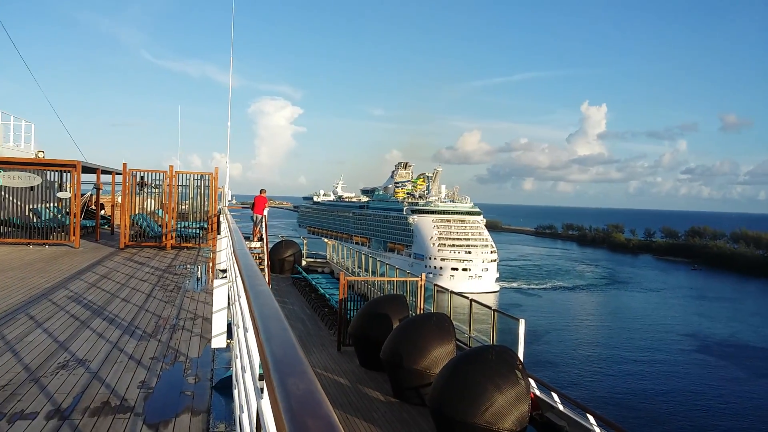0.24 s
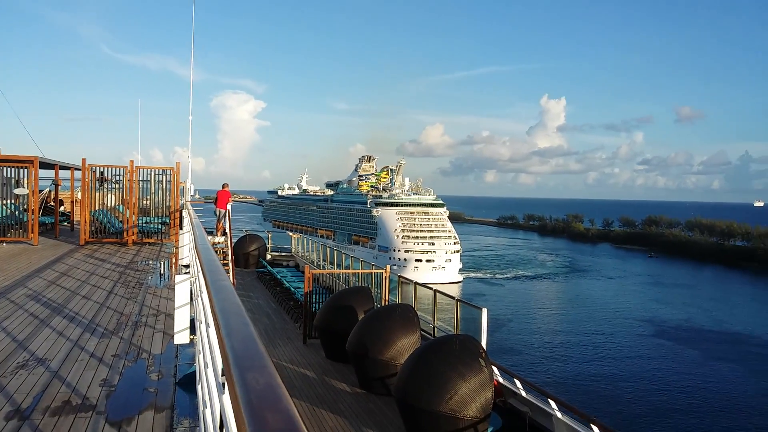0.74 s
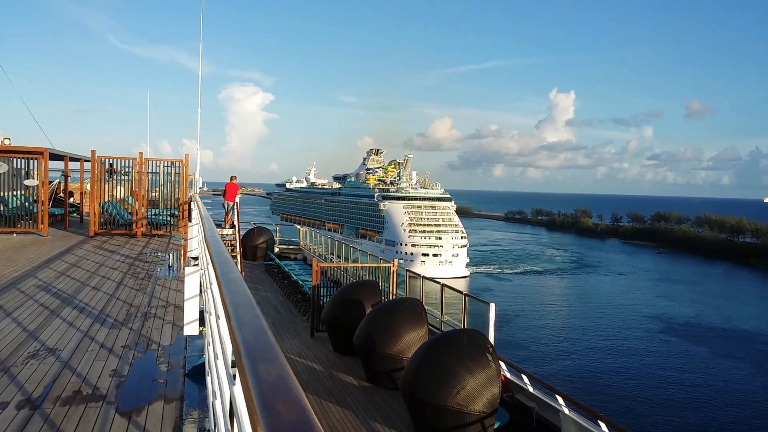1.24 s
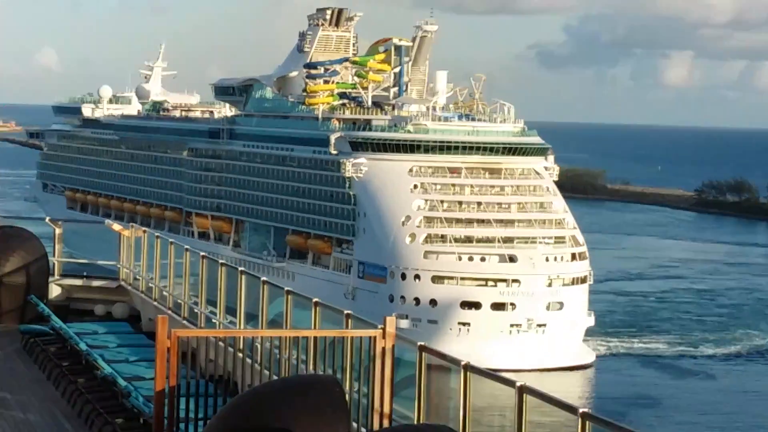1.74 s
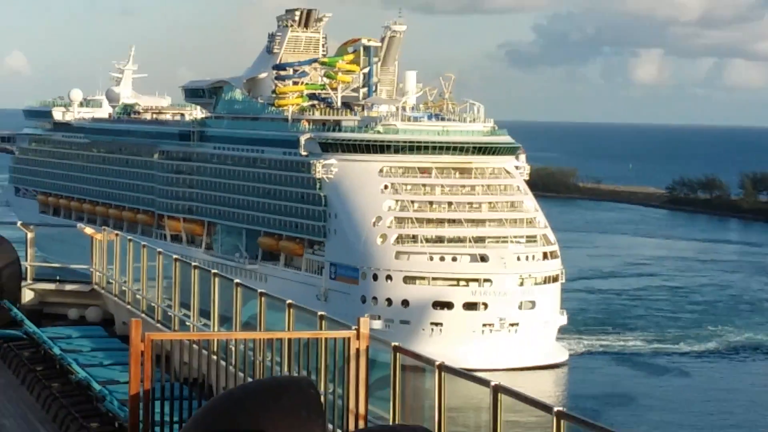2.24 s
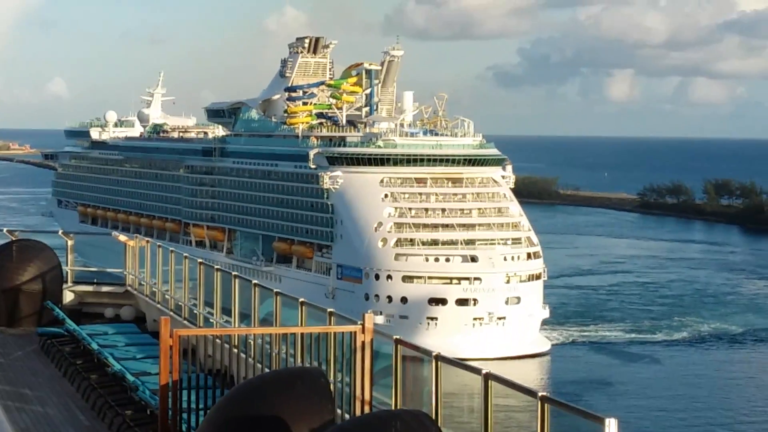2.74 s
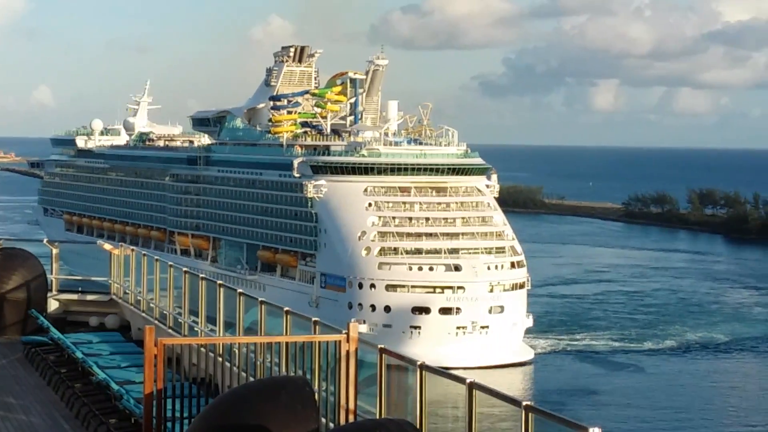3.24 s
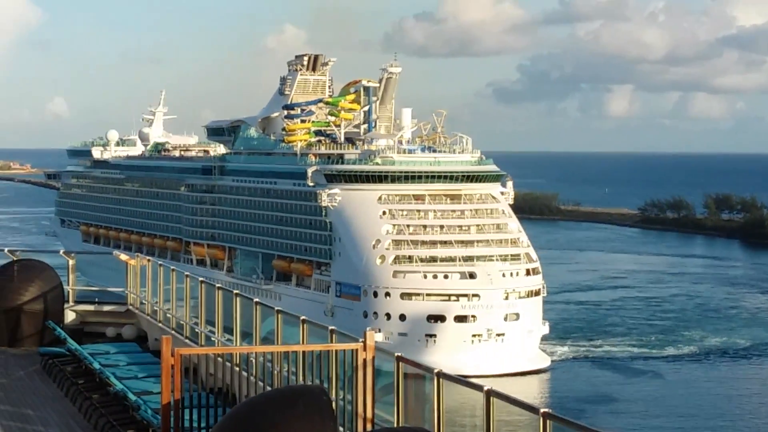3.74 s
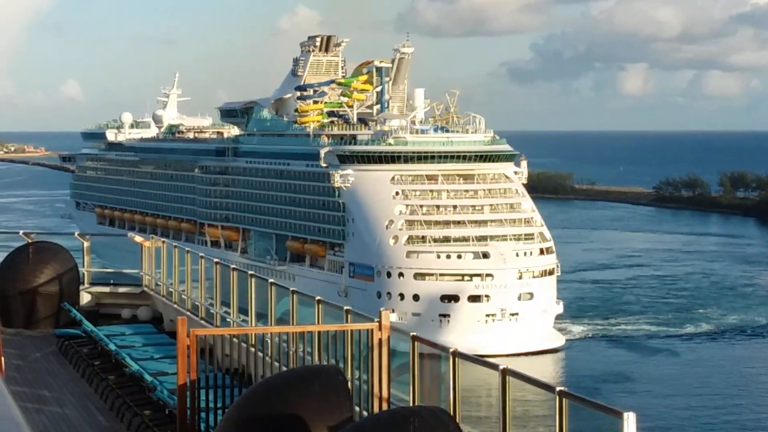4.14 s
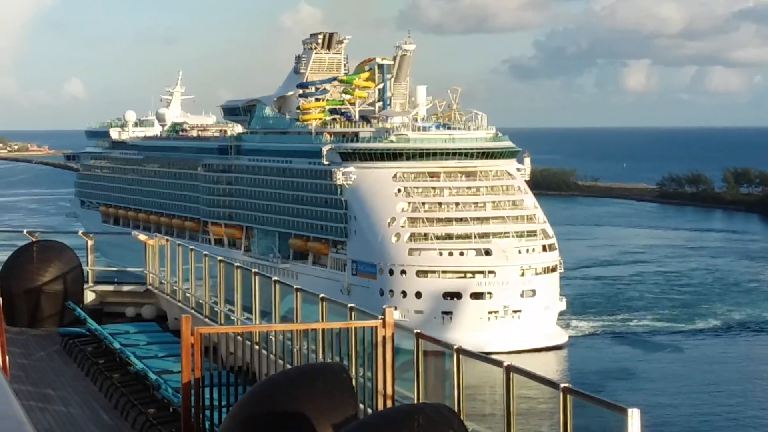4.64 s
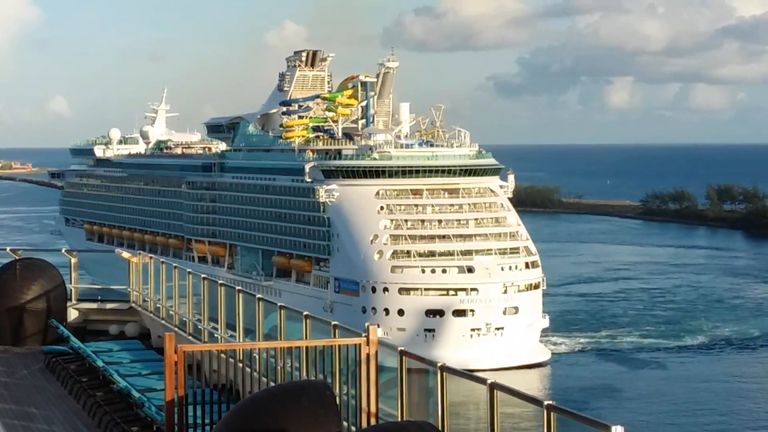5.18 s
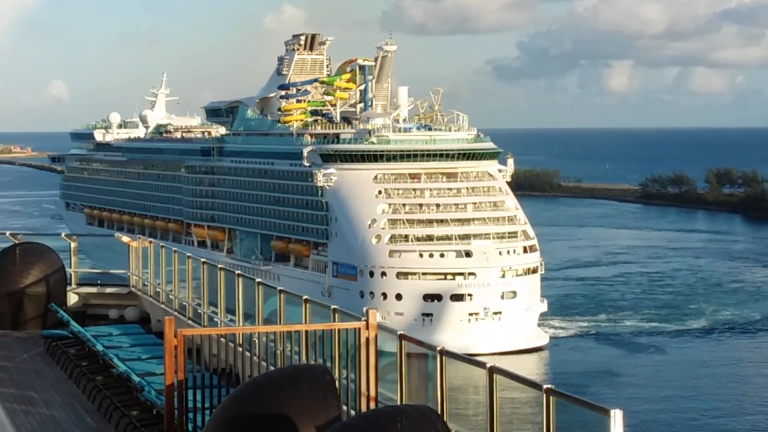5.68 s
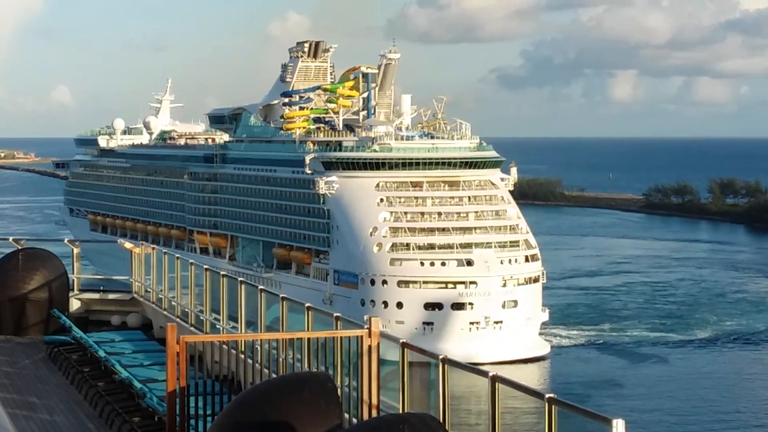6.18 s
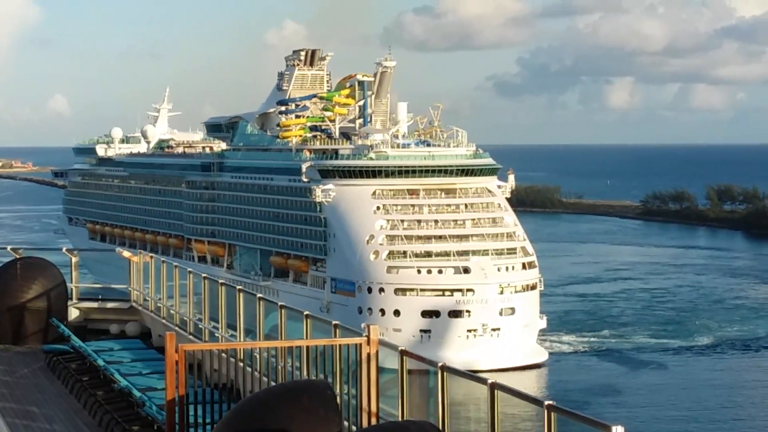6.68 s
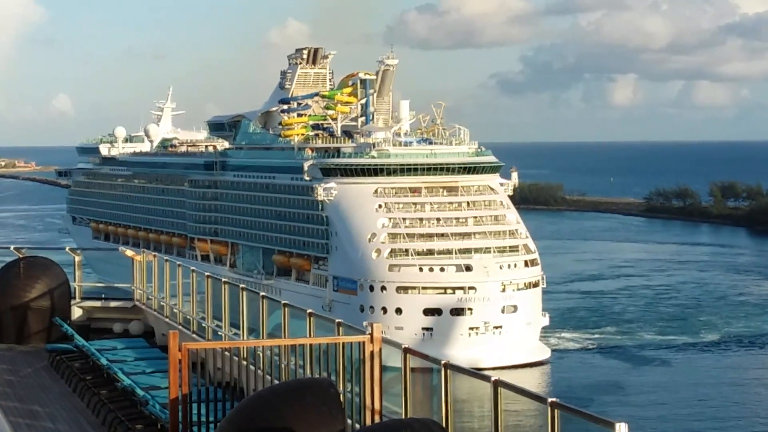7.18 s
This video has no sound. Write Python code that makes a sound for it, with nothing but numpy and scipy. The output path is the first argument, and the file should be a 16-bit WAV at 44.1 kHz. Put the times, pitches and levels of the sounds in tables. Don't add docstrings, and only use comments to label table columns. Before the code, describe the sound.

Deep throbbing ship engine surges, holds and suddenly falls, with constant vent and water hiss, late wind buffets and a faint singing rail.

```python
import sys
import numpy as np
from scipy import signal
from scipy.fft import rfft, irfft, next_fast_len
from scipy.io import wavfile
from scipy.ndimage import uniform_filter1d, map_coordinates

SR = 44100
rng = np.random.default_rng(int(sys.argv[2]) if len(sys.argv) > 2 else 0)


def bounce(signal):
    frames = np.transpose(np.atleast_2d(signal))
    limited = np.clip(frames, -1, 1)
    pcm = np.round(limited * 32767).astype(np.int16)
    wavfile.write(sys.argv[1], SR, pcm)


def ratio_of_db(decibels):
    return 10 ** (np.asarray(decibels, float) / 20)


N = 327033


def unit(x):
    return x / np.sqrt(np.mean(x ** 2) + 1e-20)


def along(points, hz):
    f, v = np.transpose(points)
    return np.interp(np.log(hz + 1), np.log(f + 1), v)


def curves(rows):
    s, *cols = np.transpose(rows)
    return [np.interp(np.arange(N) / SR, s, c) for c in cols]


def wobble(rate_hz):
    knots = rng.standard_normal(int(N * rate_hz / SR) + 4)
    return map_coordinates(knots, [np.arange(N) * rate_hz / SR])


def filtered(x, response):
    m = next_fast_len(N + 8192)
    return irfft(rfft(x, m) * response(np.fft.rfftfreq(m, 1 / SR)), m)[..., :N]


def ports(pair, alike):
    # (frequency [Hz], lead [rad])
    lead_rad = [(30, 0), (250, .12), (430, .3), (600, .95), (860, 1.1), (1350, 3.1), (1750, 4.6),
                (2200, 4.8), (3500, 7)]

    def turn(hz):
        return np.arccos(np.clip(along(alike, hz), 0, 1)) / 2

    def lag(hz):
        return np.exp(.5j * along(lead_rad, hz) * np.array([[1], [-1]]))

    mid, side = filtered(pair, lambda hz: np.array([np.cos(turn(hz)), np.sin(turn(hz))]))
    return filtered(np.array([mid + side, mid - side]), lag)


def patchy(depth_db):
    z = signal.stft(rng.standard_normal((2, N)), nperseg=512)[2]
    field = rng.standard_normal(z.shape[1:])
    field = uniform_filter1d(field, size=5, axis=0)
    field = uniform_filter1d(field, size=12, axis=1)
    return signal.istft(z * ratio_of_db(depth_db * unit(field)), nperseg=512)[1][:, :N]


def bursts(rows, rest_db):
    t = np.arange(0, N + 64, 64) / SR
    power = ratio_of_db(2 * rest_db)
    for s, half_s, db in rows:
        power = power + ratio_of_db(2 * db) * np.exp(-2 * ((t - s) / half_s) ** 2)
    return np.interp(np.arange(N) / SR, t, 10 * np.log10(power))


def engine_level():
    idle_db, primed_db, full_db, surge_db, low_db = -20, -10, -2, 4, -19
    prime_s, jump_s, drop_s = 1.25, 1.56, 6.657
    prime_rise_s, snap_s, surge_s, fade_db_per_s = .4, 0.011, 0.088, -11.5
    t = np.arange(N) / SR

    def step(s, rise_s):
        return np.clip((t - s) / rise_s + .5, 0, 1)

    full = full_db + surge_db * np.exp(-np.abs(t - jump_s) / surge_s)
    fading = low_db + fade_db_per_s * (t - drop_s)
    level = idle_db + step(prime_s, prime_rise_s) * (primed_db - idle_db)
    level = level + step(jump_s, snap_s) * (full - level)
    return level + step(drop_s, snap_s) * (fading - level)


def engine():
    # (shaft order [-], just after the jump [dB], speeding up [dB], settled [dB], cruising [dB])
    orders_db = [(4, -36, -33, -28.5, -30), (5, -36, -41, -40, -38), (6, -44, -39, -41, -40),
                 (7, -41, -41, -37, -37), (8, -36, -35, -32, -33), (9, -40, -41, -43, -46),
                 (10, -37, -45, -43, -42), (11, -37, -29, -29.5, -28.5), (12, -24, -30, -28, -29),
                 (13, -32, -24, -30, -29), (14, -41, -41, -41, -42), (15, -40, -36, -39, -38),
                 (16, -28, -27, -38, -40), (17, -31, -37, -40, -39), (18, -44, -48, -43, -46),
                 (19, -38, -44, -41, -44), (20, -45, -42, -43, -40), (21, -42, -42, -43, -45),
                 (22, -40, -44, -43, -40), (23, -38, -40, -49, -47)]
    # (frequency [Hz], density [dB per Hz])
    roar_db = [(15, -45), (25, -18), (55, -3), (110, -2), (160, -4), (210, -2), (290, -5), (370, -6),
               (480, -17), (600, -20), (780, -50), (1320, -120)]
    # (time [s], shaft speed [Hz])
    speed_hz = [
        (0, 12.6),
        (1.0, 13.2),
        (1.35, 14.76),
        (1.6, 15.5),
        (2.05, 16.42),
        (2.68, 17.31),
        (2.9, 17.17),
        (6.4, 17.11),
        (6.6, 16.2),
    ]
    # (time [s], running stage [0-3])
    stages = [
        (1.8, 0),
        (2.0, 1),
        (2.36, 1),
        (2.6, 2),
        (3.9, 2),
        (4.6, 3),
    ]
    turns = np.cumsum(curves(speed_hz)[0]) / SR
    stage = curves(stages)[0]
    hum = np.zeros(N)
    for order, *stage_db in orders_db:
        level_db = np.interp(stage, np.arange(len(stage_db)), stage_db) + 1.7 * wobble(4)
        smear = 1.1e-5 * order ** 3 * wobble(8)
        phase = round(order) * turns + rng.random() + smear
        hum += np.sqrt(2) * ratio_of_db(level_db) * np.sin(2 * np.pi * phase)
    hum = hum * [[1.3], [.08]]
    throb = ratio_of_db(2.1 * np.cos(2 * np.pi * turns) + 0.4 * wobble(10.0))
    roar = filtered(throb * patchy(depth_db=-1.0), lambda hz: ratio_of_db(along(roar_db, hz)))
    roar = ratio_of_db(-25.5) * unit(roar)
    return ports(ratio_of_db(engine_level()) * (hum + roar), [(40, 1.0), (500, 0.76)])


def deck():
    # (frequency [Hz], density [dB per Hz])
    left_db = [(30, -21), (60, 5), (150, -3.5), (300, -1.5), (500, -7), (900, -11), (1500, -20.5),
               (2200, -24), (3200, -28), (4200, -31), (5100, -29.5), (6000, -42.5), (7500, -54.5),
               (11000, -67.5)]
    right_db = [(30, -23), (60, 2), (150, -1), (300, -1.5), (500, -7), (900, -8.5), (1500, -15),
                (2200, -24), (3200, -31.5), (4200, -44), (5100, -50.5), (6000, -50.5), (7500, -62.5),
                (11000, -65.5)]
    # (frequency [Hz], left-right likeness [0-1])
    alike = [(40, 1), (150, 0.78), (330, .93), (520, 0.2), (620, 1), (850, 0.7), (1150, 0.34), (1750, .75),
             (2100, 0.6), (2400, .12), (5000, 0.092)]
    # (frequency [Hz], level [dB rms])
    fan_tones = [
        (151.5, -38.5),
        (231.5, -42),
    ]
    # (time [s], nearness [0-1])
    finger = [
        (1.12, 0.2),
        (1.2, 0.97),
        (2.52, 0.99),
        (2.58, 0.24),
    ]
    # (frequency [Hz], gain [dB])
    shadow_db = [(1100, 1), (1500, 6), (2050, 4.5), (2400, -5), (3500, -5), (4400, 0)]
    hiss_db, lull_s, lull_db = -28, 6.4, -0.65
    t = np.arange(N) / SR
    hiss = ports(patchy(depth_db=0.64), alike)
    hiss = filtered(hiss, lambda hz: ratio_of_db(np.array([along(left_db, hz), along(right_db, hz)])))
    near = np.clip(curves(finger)[0], 0, 1)
    shadowed = filtered(hiss[0], lambda hz: ratio_of_db(along(shadow_db, hz)))
    hiss[0] += near * (shadowed - hiss[0])
    fans = np.zeros(N)
    for hz, db in fan_tones:
        fans += ratio_of_db(db + 3 + 1.2 * wobble(3)) * np.sin(2 * np.pi * hz * t + .3 * wobble(4))
    lull = lull_db * np.clip((t - lull_s) / .5 + .5, 0, 1)
    return ratio_of_db(hiss_db + lull + 0.32 * wobble(6.4)) * unit(hiss) + fans


def eddies(rows, brevity, sway):
    t = np.arange(-2048, 2048) / SR
    out = np.zeros(N + 4096)
    for (s, db, hz), turn in zip(rows, rng.normal(0, sway, len(rows))):
        cycle = 2 * np.pi * (hz * t + turn)
        push = np.sin(cycle) + 0.13 * np.sin(2 * cycle) + 0.089 * np.sin(3 * cycle)
        out[round(s * SR):][:4096] += ratio_of_db(db) * np.exp(-(brevity * hz * t) ** 2) * push
    return out[2048:N + 2048]


def wind():
    # (time [s], half length [s], level [dB])
    gusts = [(.1, 0.051, -20), (.35, .1, -34), (.9, .05, -20.5), (1.17, 0.054, -18), (2.1, .04, -24),
             (2.5, .14, -24.5), (3.0, .07, -31), (3.5, .05, -27), (3.72, .07, -26), (4.0, 0.068, -12.5),
             (4.17, 0.095, -12.5), (4.4, 0.095, -14.5), (5.0, .05, -33), (5.55, 0.11, -15.5),
             (6.03, 0.083, -16), (6.2, 0.042, -3), (6.4, 0.044, -11), (6.6, 0.16, -12.5), (6.92, 0.12, -25),
             (7.3, 0.11, -19.5)]
    # (frequency [Hz], density [dB per Hz])
    buffet_db = [(15, -43.5), (25, -19.5), (59, 2), (172, -3), (234, -15), (339, -13), (926, -27),
                 (1200, -35.5), (1560, -68.5), (2640, -120)]
    # (time [s], puff level [dB], puff pitch [Hz], thud level [dB])
    large = [(2.577, -17, 140, -18), (3.969, -5, 140, -17), (4.008, -6, 200, -14), (4.034, -12, 140, -13),
             (4.203, -7, 210, -17), (4.411, -10, 180, -21), (4.454, -16, 140, -15), (5.475, -6, 240, -17),
             (5.999, -10, 270, -17), (6.063, -12, 150, -22), (6.146, -12, 140, -12), (6.189, -11, 180, -14),
             (6.212, -10, 400, -25), (6.302, -7, 200, -13), (6.32, -7, 190, -12), (6.389, -10, 170, -22),
             (6.414, -6, 150, -13), (6.436, -4, 250, -11), (6.488, -8, 170, -13), (6.54, -5, 200, -13),
             (6.562, -10, 160, -16), (6.675, -10, 660, -18), (6.701, -9, 200, -23), (6.727, -10, 180, -21),
             (6.777, -15, 450, -25), (6.922, -8, 230, -20), (6.99, -9, 250, -24), (7.014, -16, 130, -15),
             (7.087, -11, 210, -24), (7.39, -13, 450, -28)]
    calm_db, thud_hz, thud_lag_s = -42.5, 80, .003
    small_per_s, small_hz = 40, 171
    small_db, small_thud_db, small_grows = -19, -5.5, .7

    gust_db = bursts(gusts, calm_db)
    lumps = ratio_of_db(3 * wobble(30)) * rng.standard_normal(N)
    buffet = unit(filtered(lumps, lambda hz: ratio_of_db(along(buffet_db, hz))))
    buffet = ratio_of_db(gust_db - 12.5) * buffet

    count = int(small_per_s * N / SR)
    time_luck, level_luck, pitch_luck, thud_luck = rng.random((count, 4)).T
    s = (np.arange(count) + time_luck) / small_per_s
    db = small_db + small_grows * (gust_db[(s * SR).astype(int)] + 15) + 10 * (level_luck - .5)
    hz = small_hz * 1.8 ** (pitch_luck - .4)
    small = np.transpose([s, db, hz, db + small_thud_db + 8 * (thud_luck - .5)])

    s, puff_db, hz, thud_db = np.vstack([large, small]).T
    puffs = ratio_of_db(.8) * eddies(np.transpose([s, puff_db, hz]), brevity=1.8, sway=.12)
    rock_hz = thud_hz * (1 + 0.13 * rng.standard_normal(len(s)))
    thuds = ratio_of_db(3.5) * eddies(np.transpose([s + thud_lag_s, thud_db, rock_hz]), brevity=1.0, sway=0.28)
    return (buffet + puffs + thuds) * ratio_of_db([[0], [-24]])


def fittings():
    # (time [s], half length [s], level [dB])
    rail = [
        (6.32, .08, -39),
        (6.55, .03, -41),
        (6.67, .06, -39),
        (6.79, .03, -32),
        (6.89, .035, -32.5),
        (7.06, .05, -39),
        (7.2, .04, -41),
    ]
    # (time [s], length [s], pitch [Hz], width [Hz], level [dB])
    squeaks = [
        (1.165, .09, 4540, 700, -60),
        (1.364, .004, 5200, 2600, -56),
        (1.69, .046, 5000, 760, -59),
        (2.403, 0.13, 475, 9.5, -31.5),
        (2.508, .08, 1040, 110, -40),
        (3.95, .08, 5100, 300, -63),
        (4.21, .12, 5080, 250, -59),
        (4.923, 0.16, 888, 13, -40.5),
        (5.227, 0.18, 1165, 16, -43),
    ]
    # (frequency [Hz], left over right [dB])
    squeak_pan_db = [(470, -3), (1100, 7), (5000, 13.5)]
    rail_hz, sag_hz_per_s, hum_db, from_s, to_s = 775, 12, -46, 6.2, 7.25
    t = np.arange(N) / SR
    pitch_hz = rail_hz - sag_hz_per_s * np.clip(t - rail[1][0], 0, 1) + 3 * wobble(7)
    awake = np.clip(np.minimum(t - from_s, to_s - t) / 0.11 + 1, 0, 1)
    rail_db = bursts(rail, hum_db) + np.array([[-2.5], [2.1]])
    out = awake * ratio_of_db(rail_db) * np.sin(2 * np.pi * np.cumsum(pitch_hz) / SR)
    for s, length_s, hz, width_hz, db in squeaks:
        near = slice(round(s * SR) - 16384, round(s * SR) + 16384)
        band = np.exp(-((np.fft.rfftfreq(32768, 1 / SR) - hz) / width_hz) ** 2)
        scrape = unit(irfft(band * rfft(rng.standard_normal(32768))))
        swell = np.exp(-4 * ((t[near] - s) / length_s) ** 2)
        pan = ratio_of_db(along(squeak_pan_db, hz) * np.array([[.5], [-.5]]))
        out[:, near] += ratio_of_db(db) * swell * scrape * pan
    return out


def scene():
    return engine() + deck() + wind() + fittings()


def band_limit(x):
    return signal.sosfilt(signal.butter(12, 15720, fs=SR, output="sos"), x)


def record(dry):
    cut = filtered(dry, lambda hz: (1j * hz / (1j * hz + 30)) ** 4)
    hiss = ratio_of_db(-89.0) * rng.standard_normal(dry.shape)
    held = cut / (1 + np.abs(cut / .95) ** 4) ** .25
    return band_limit(held + hiss)


dry = scene()
out = record(dry)
bounce(out)
```